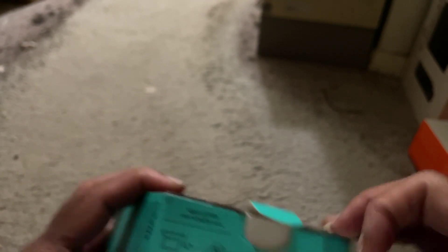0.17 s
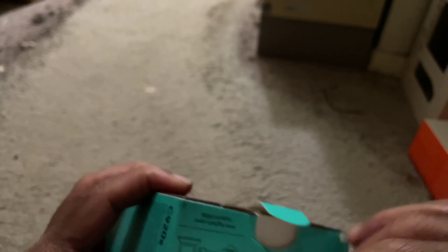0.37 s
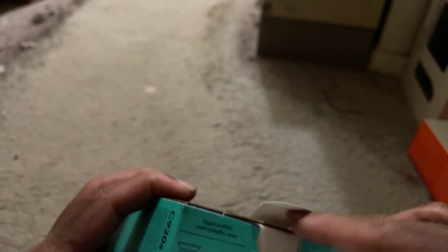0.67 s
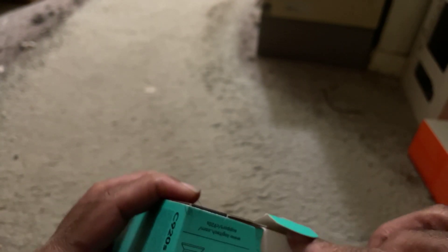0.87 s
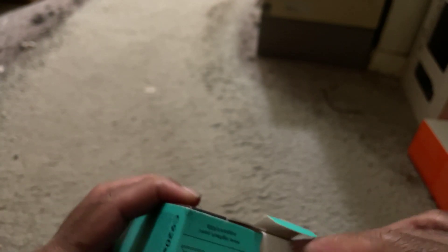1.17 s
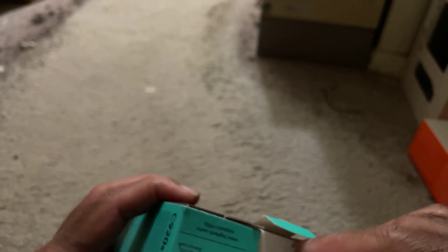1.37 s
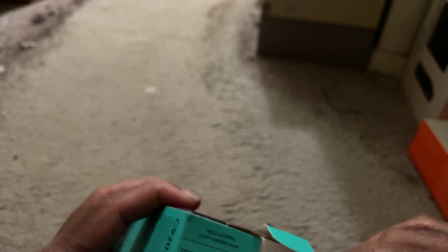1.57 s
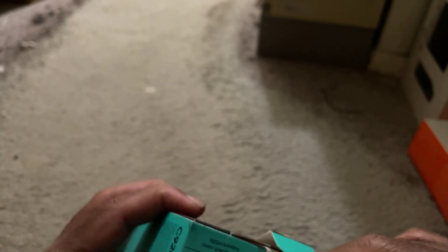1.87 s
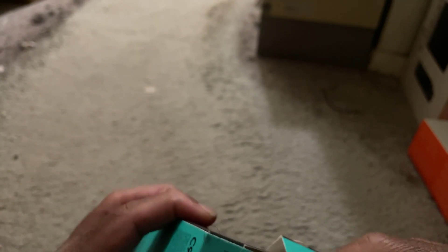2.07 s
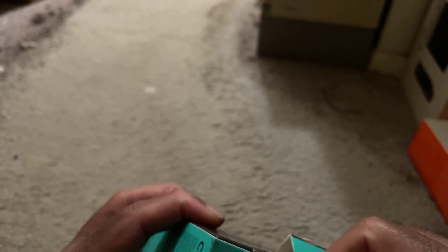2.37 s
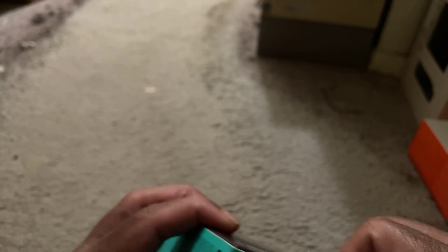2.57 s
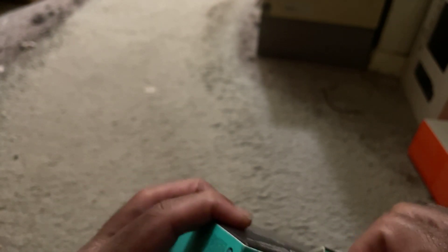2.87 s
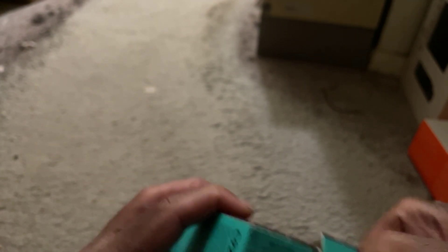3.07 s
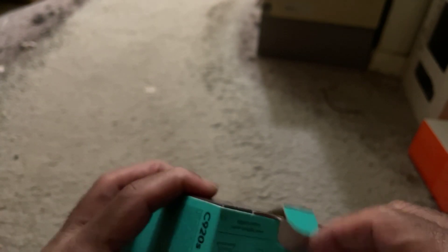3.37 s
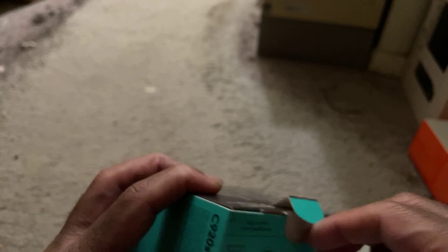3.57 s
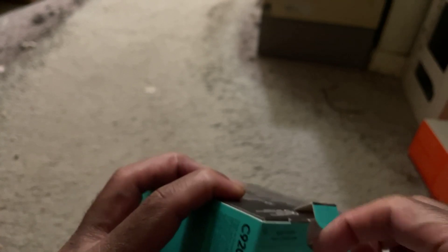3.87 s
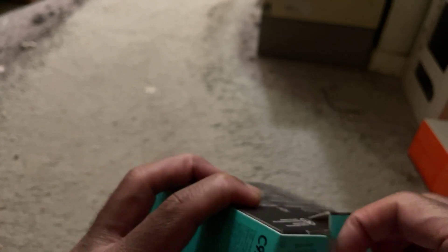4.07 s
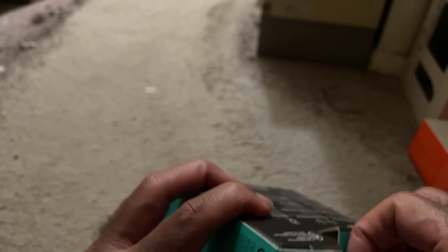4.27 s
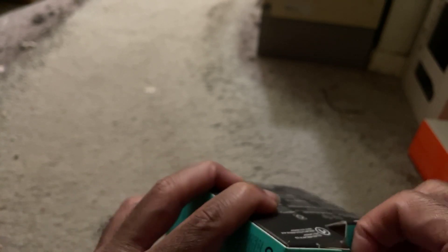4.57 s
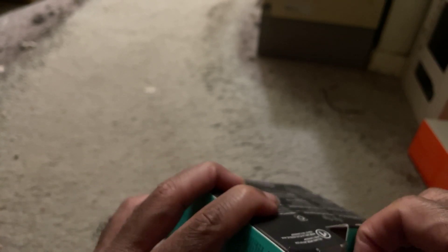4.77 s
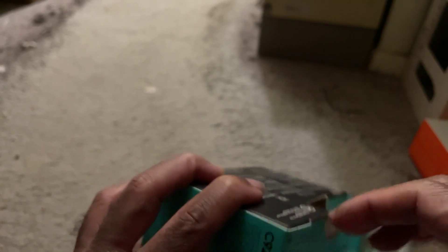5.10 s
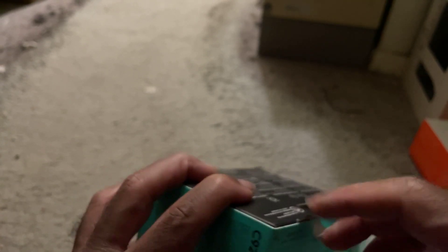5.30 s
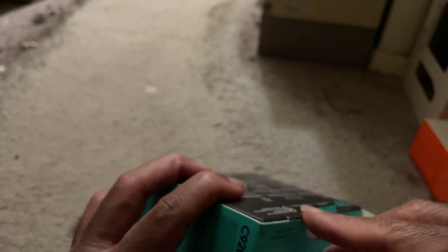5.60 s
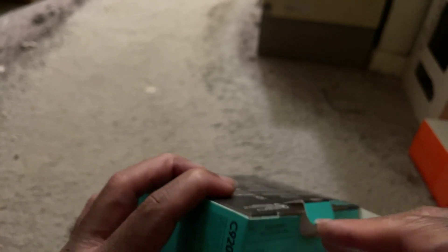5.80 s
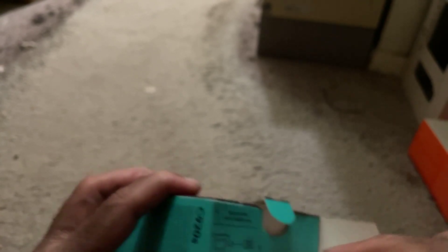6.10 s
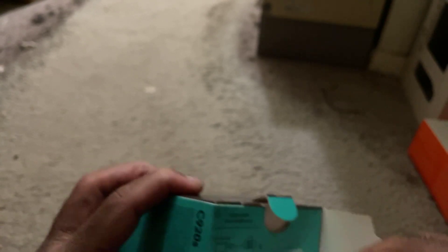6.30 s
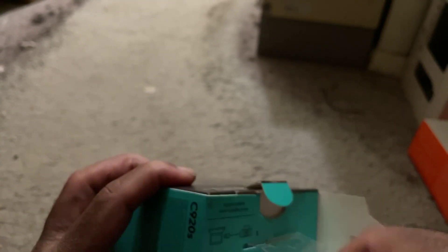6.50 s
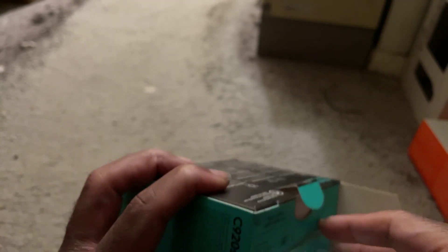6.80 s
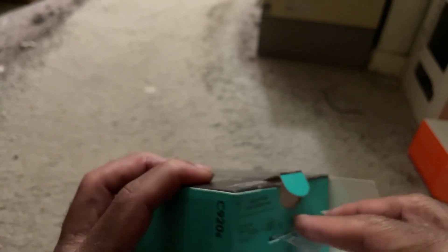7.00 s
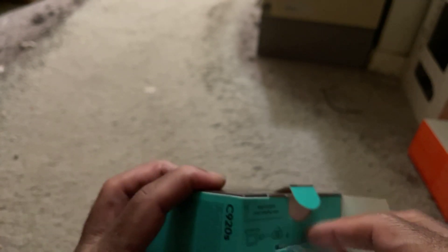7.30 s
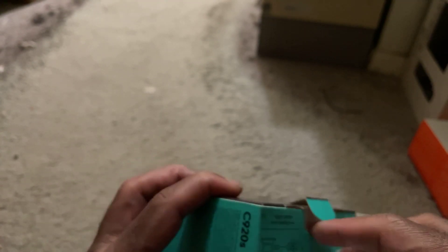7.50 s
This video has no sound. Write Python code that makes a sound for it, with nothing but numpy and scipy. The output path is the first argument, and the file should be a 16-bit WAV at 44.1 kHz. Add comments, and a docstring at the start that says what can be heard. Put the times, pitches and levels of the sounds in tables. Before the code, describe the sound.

Stiff card flaps crack and pop as nails pick at them, with faint skin rustle and rasping strokes in a quiet room.

```python
"""Hands work the lid of a small cardboard box open, close up in a quiet room with a low, wavering hum.
From the start palms rustle on the walls, nails catch and flaps snap free as bursts of tiny fractures.
Between the snaps card scrapes on card in strokes of stick and slip; snaps crowd together around
1.5-1.8 s and the hardest crack falls just after 3 s. All slips are filtered by the box's panels, whose
resonances change strength once the flap is out at 5.6 s; a soft room tail follows every sound."""
import sys
import numpy as np
from scipy import signal
from scipy.fft import rfft, irfft
from scipy.io import wavfile
from scipy.ndimage import uniform_filter1d

SR = 44100
rng = np.random.default_rng(int(sys.argv[2]) if len(sys.argv) > 2 else 0)


def materialize(psi):
    """Save the field psi as 16-bit PCM at rate SR to the path in sys.argv[1].

    A 1-D psi becomes a single channel; in a 2-D psi each row is a channel.
    """
    bounded = np.clip(np.atleast_2d(psi).T, -1, 1)
    quanta = np.round(bounded * 32767).astype(np.int16)
    wavfile.write(sys.argv[1], SR, quanta)


N = 337355


def amp(db):
    """Decibels to gain."""
    return 10 ** (np.asarray(db) / 20)


def unit(x):
    """Scales to rms 1."""
    return x / np.sqrt(np.mean(x ** 2) + 1e-20)


def read(points, hz):
    """Reads a table of (Hz, value) on a log-frequency axis."""
    f, value = np.transpose(points)
    return np.interp(np.log(hz + 1), np.log(f + 1), value)


def add(mix, s, sound):
    """Mixes a sound in at time s in seconds."""
    part = mix[max(round(s * SR), 0):][:len(sound)]
    part += sound[:len(part)]


def drift(count, rate):
    """Random wander: straight lines between normal random points, rate points a second."""
    knots = np.arange(count) * rate / SR
    points = rng.standard_normal(int(knots[-1]) + 2)
    return np.interp(knots, np.arange(len(points)), points)


def phased(gain_db):
    """Causal (minimum-phase) spectrum with the given gain in each bin."""
    log_gain = np.log(amp(np.concatenate([gain_db, gain_db[-2:0:-1]])))
    return np.exp(np.conj(signal.hilbert(log_gain)))[:len(gain_db)]


# Still air of the room, a spectral shape. Each row: frequency in Hz, relative density in dB per Hz.
AIR = [(20, -38), (32, -54), (44, 6.5), (62, 3), (76, 2.5), (100, -2.5), (122, -11), (165, -10.5),
       (400, -17), (1100, -27.5), (2000, -36.5), (5000, -40.5), (9500, -49.5), (16000, -42)]
AIR_DB = -57.5  # rms of the air, dB
# Steady tones of the hum. Each row: frequency in Hz, rms level in dB.
HUM = [(75, -62), (120, -66.5)]


def background(waver_rad=0.34):
    """Ventilation rumble and faint hiss from shaped noise, under hum tones whose phase wavers."""
    t, hz = np.arange(N) / SR, np.fft.rfftfreq(N, 1 / SR)
    noise = rfft(rng.standard_normal(N))
    air = unit(irfft(noise * amp(read(AIR, hz)), N))
    hum = np.zeros(N)
    for f, db in HUM:
        phase = 2 * np.pi * f * t + waver_rad * drift(N, rate=8.3)
        hum += amp(db) * unit(np.sin(phase))
    return amp(AIR_DB) * air + hum


def slips(count, rate, spread_db):
    """Random train of tiny slips, rate a second, a few far larger than the rest."""
    sizes = amp(spread_db * np.minimum(rng.exponential(1, count), 4))
    happens = rng.random(count) < rate / SR
    return unit(sizes * rng.choice([-1, 1], count) * happens)


def stutter(count, rate, grip_time, depth):
    """Stick and slip: the edge lets go at uneven moments and slides briefly until it grips again."""
    gaps, sizes = rng.uniform(.3, 1.7, (2, 200))
    starts = np.cumsum(gaps) / rate
    t = np.arange(count) / SR + starts[0]
    last = np.searchsorted(starts, t, "right") - 1
    return 1 + depth * sizes[last] * np.exp(-(t - starts[last]) / grip_time)


# Resonances of the box's panels.
# Each row: frequency in Hz, width in Hz, lift while shut in dB, lift once open in dB.
PANELS = [(280, 210, 10, 2), (565.5, 167, 7.5, 7), (890, 356, 5.5, 9), (1112, 130, 12.5, 8.5),
          (1417, 130, 5, 4.5), (1862, 34, 7.5, 2), (2055, 360, 4.5, 3.5), (2680, 770, 4.5, 7.5),
          (4690, 520, 5, -4), (7100, 1600, 3.5, 2), (13000, 20000, 4.5, -8)]
OPENS_AT = 5.6  # s, the flap comes out
# Colour of breaking and slipping fibres. Each row: frequency in Hz, gain in dB.
FIBRES = [(30, -11.5), (110, 1.5), (300, -1), (700, 3.5), (1500, 4.5), (3500, 5), (8300, 0), (9800, -5),
          (12500, -4.5), (15000, 0), (16500, -37.5)]


def box(s, ripple_db, ring_hz, ring_db, ring_q=2.9, damping_hz=80, ripple_hz=150, grip=0.026,
        bass_lag_s=0.01384, lag_hz=260, size=4096):
    """Response to one slip at time s: panel resonances, finer ones that vary by spot, and a ringing part."""
    hz = np.fft.rfftfreq(size, 1 / SR)
    f, width, shut_db, open_db = np.transpose(PANELS)[:, :, None]
    f = f * (1 + grip * rng.standard_normal(f.shape))  # the pitches shift from one response to the next
    lift_db = shut_db if s < OPENS_AT else open_db
    panels = (lift_db / (1 + (2 * (hz - f) / width) ** 2)).sum(0)
    ring_width = ring_hz / ring_q + damping_hz
    ring = ring_db / (1 + (2 * (hz - ring_hz) / ring_width) ** 2)
    spot = np.interp(hz / ripple_hz, np.arange(len(hz)), rng.standard_normal(len(hz)))
    gain_db = read(FIBRES, hz) + panels + ring + ripple_db * spot
    # low bending waves travel slowly, so the thump trails the crack
    lag = bass_lag_s / (1 + (hz / lag_hz) ** 2)
    lag_phase = 2 * np.pi * np.cumsum(lag) * hz[1]
    return irfft(phased(gain_db) * np.exp(-1j * lag_phase))


# Limits between the low, middle and high bands, in Hz.
BAND_EDGES_HZ = (700, 3500)
# Points where the tilt is set, in Hz: low, middle twice, high twice, top octave.
BAND_CENTRES_HZ = (450, 950, 2700, 4700, 8500, 12000)


def voiced(x, levels_db, seconds, top_db, sheen=0.62, sheen_knee_db=-5, size=2048):
    """Tilts a sound toward a level per band; the more its hiss stands out, the more top octave."""
    power = abs(rfft(x)) ** 2 * 2 / len(x) / (seconds * SR)
    band = np.digitize(np.fft.rfftfreq(len(x), 1 / SR), BAND_EDGES_HZ)
    present_db = 10 * np.log10(np.bincount(band, power) + 1e-20)
    low, middle, high = levels_db - present_db
    sharpness_db = levels_db[2] - levels_db[1] - sheen_knee_db
    top = high + top_db + sheen * np.clip(sharpness_db, -5, 5)
    points = list(zip(BAND_CENTRES_HZ, (low, middle, middle, high, high, top)))
    tilt_db = read(points, np.fft.rfftfreq(size, 1 / SR))
    return signal.fftconvolve(x, irfft(phased(tilt_db)))


# How firmly the skin slides on the walls. Each row: time in seconds, level in dB.
RUSTLE = [(0, -57.5), (0.55, -64.5), (0.73, -72.5), (2.05, -70.5), (2.55, -62.5), (2.9, -67.5),
          (3.52, -61.5), (3.96, -72), (4.601, -64), (4.77, -71), (4.98, -63), (5.58, -71.5), (5.85, -66),
          (6.55, -64.5), (6.85, -68.5), (7.33, -62), (7.45, -71.5), (7.6, -56.5)]


def rustle(body_db=-1, rasp_db=0, hiss_db=-4.0, edge_hz=4900, edge_db=3, count=60):
    """Fingers shift from spot to spot on the walls: overlapping rubs of fine, stuttering slips."""
    out, hop = np.zeros(N), N // count
    for s in np.arange(count) * hop / SR:
        pressure = signal.windows.cosine(2 * hop) * stutter(2 * hop, rate=35, grip_time=.004, depth=1)
        force = pressure * slips(2 * hop, rate=7000, spread_db=2.5)
        rub = signal.fftconvolve(force, box(s, ripple_db=2.0, ring_hz=edge_hz, ring_db=edge_db))
        add(out, s, voiced(rub, np.array([body_db, rasp_db, hiss_db]), hop / SR, top_db=-1.5))
    firmness_db = np.interp(np.arange(N) / SR, *np.transpose(RUSTLE))
    return out * amp(firmness_db)


def fractures(swell, rate, spread_db, size=96):
    """A burst of slips under a swell, its spectrum evened out as for very short breaks."""
    spectrum = rfft(slips(len(swell), rate, spread_db) * swell)
    colour_db = 10 * np.log10(abs(uniform_filter1d(abs(spectrum) ** 2, size)) + 1e-9)
    return irfft(spectrum * phased(-colour_db))


# Snaps of creases and flaps. Each row: time in seconds, crack at 700-3500 Hz in dB,
# edge above 3500 Hz in dB relative to the crack, crumbling time in seconds, part that rings.
SNAPS = [(0.016, -44.5, -7.5, 0.00026, "wall"), (0.079, -39.5, -5.5, 0.0056, "rim"),
         (0.131, -41, -7.5, 0.0029, "rim"), (0.17, -47.5, -16, 0.0034, "rim"),
         (0.287, -45, -8, 0.006, "tab"), (0.406, -44.5, -7, 0.0004, "rim"),
         (0.523, -50.5, 0, 0.0012, "rim"), (0.552, -36, -10.5, 0.0027, "crease"),
         (0.5914, -44, -15, 0.0013, "tab"), (0.663, -47, -8, 0.001, "wall"),
         (0.7962, -39.5, 6, 0.00042, "hanger"), (0.9456, -38.5, -6.5, .002, "tab"),
         (0.961, -37.5, -2.5, 0.0031, "tab"), (1.158, -49.5, -8, 0.0021, "wall"),
         (1.228, -53.5, -19, .002, "flap"), (1.357, -50, -8.5, 0.00085, "crease"),
         (1.421, -48.5, -12, 0.0009, "wall"), (1.436, -47.5, -16, 0.0018, "flap"),
         (1.4965, -44, -3, 0.00059, "tab"), (1.513, -37, -10, 0.0034, "crease"),
         (1.526, -30.5, -11, 0.0011, "tab"), (1.535, -34, -7.5, 0.00082, "flap"),
         (1.542, -39.5, -2, 0.0018, "crease"), (1.722, -43, -15, .002, "tab"),
         (1.75, -32, -13.5, 0.005, "tab"), (1.757, -37.5, -15, 0.0036, "tab"),
         (1.78, -43, -10, 0.0041, "lid"), (1.798, -43.5, -10, 0.0046, "tab"),
         (1.82, -48, -17, 0.0024, "tab"), (1.84, -46.5, -16, 0.0062, "lid"),
         (1.902, -43.5, -13, 0.0016, "rim"), (1.9181, -36.5, -12.5, 0.0051, "tab"),
         (1.939, -40, -14, 0.0064, "tab"), (1.952, -44, -9, 0.0019, "lid"),
         (2.1, -41.5, -13, 0.0035, "lid"), (2.111, -39, -14, 0.0044, "tab"),
         (2.254, -51.5, -7, 0.0032, "rim"), (2.289, -45.5, -7, 0.006, "tab"),
         (2.4389, -40, -7.5, 0.0042, "cavity"), (2.7815, -38, -9.5, 0.0023, "lid"),
         (2.786, -45.5, -11, 0.0018, "cavity"), (2.961, -46.5, -12, .004, "lid"),
         (2.977, -46, -7.5, 0.0039, "wall"), (3.0517, -40.5, 4.5, 0.001, "lid"),
         (3.057, -25, -3, 0.0011, "crease"), (3.0676, -43, 1, 0.00092, "cavity"),
         (3.134, -46.5, -8.5, 0.016, "lid"), (3.174, -56, -3, 0.0011, "rim"),
         (3.1858, -45, -5, 0.0018, "rim"), (3.2802, -48, -3, 0.0051, "wall"),
         (3.3751, -47, -4, 0.0015, "rim"), (3.592, -42.5, -16, 0.0026, "tab"),
         (3.836, -49, -4.5, 0.0025, "tab"), (3.888, -48, -6, 0.0012, "rim"),
         (3.902, -49.5, -18, 0.0036, "flap"), (3.985, -57, -5.5, 0.0033, "tab"),
         (4.014, -47.5, -4.5, .003, "wall"), (4.155, -47.5, -4, 0.0027, "rim"),
         (4.183, -50.5, -6.5, 0.0036, "flap"), (4.572, -57, -30, 0.0017, "bottom"),
         (4.932, -55, -8, 0.0035, "wall"), (4.9847, -34, -14, 0.0028, "wall"),
         (5.0055, -30.5, -0.5, 0.00077, "flap"), (5.2456, -36, -6, 0.00078, "lid"),
         (5.386, -46, -5.5, 0.0015, "flap"), (5.423, -54, -6, 0.0028, "wall"),
         (5.694, -47.5, -1.5, 0.0015, "rim"), (5.912, -42, -32, 0.0024, "bottom"),
         (6.088, -57.5, -5, 0.0014, "rim"), (6.136, -50, -26, 0.0014, "lid"),
         (6.1655, -42.5, -14.5, 0.015, "lid"), (6.305, -48, -10, .002, "lid"),
         (6.3819, -32, 2, 0.0026, "crease"), (6.389, -47, -23, 0.0037, "bottom"),
         (6.56, -50, -7.5, .0015, "crease"), (6.702, -46, -12, 0.0016, "flap"),
         (6.716, -47.5, 2.5, .006, "rim"), (6.925, -37.5, -18, 0.0033, "lid"),
         (6.9325, -38, -5.5, 0.0042, "lid"), (7.219, -51.5, -10, 0.0017, "rim"),
         (7.543, -47, -10, 0.015, "lid"), (7.573, -37.5, -7.5, .0057, "tab"),
         (7.6445, -44.5, 11.5, 0.00063, "wall")]
SNAP_SPAN = .01  # s, snap levels are rms over this long
# Parts of the box that a snap sets ringing. Each entry: pitch in Hz, sharpness Q, resonance in dB,
# thump under 700 Hz in dB relative to the crack.
PARTS = {"hanger": (7800, 2.7, 15, 6.9), "rim": (2653, 1.5, 15.5, -3.5), "tab": (2091, 5, 13.5, -6),
         "crease": (1048, 4.5, 2.5, -6), "flap": (981, 2, 14.5, -7.5), "lid": (552, 4.5, 9.5, 1.2),
         "wall": (313, 4.3, 7.7, 4.7), "bottom": (264, 4.8, 17, 6.8), "cavity": (150, 3.5, 21.7, 5)}
GRIP_DETUNE = 0.023  # share by which the grip can raise a part's pitch; it can lower it by 1.1 times this


def snaps(strain_db=-7, strain_time=0.0026, brittle_time=0.004, size=4096, lead=512):
    """A crease creaks under strain, gives way in a burst of fractures, and the freed part rings briefly."""
    out, t = np.zeros(N), (np.arange(size) - lead) / SR
    for s, crack, edge, crumbling, part in SNAPS:
        pitch, q, resonance_db, thump = PARTS[part]
        pitch = pitch * (1 + GRIP_DETUNE * rng.uniform(-1.1, 1))
        # a brittle snap spends itself in its first fracture, with little warning
        first = np.exp(-crumbling / brittle_time)
        strain = amp(strain_db) * (1 - first) * np.exp(-abs(t) / strain_time)
        crumble = np.exp(-abs(t) / max(crumbling, 1 / SR))
        swell = np.where(t < 0, strain, crumble)
        force = first * (t == 0) + fractures(swell, rate=12000, spread_db=3.5)
        response = box(s, ripple_db=3.0, ring_hz=pitch, ring_db=resonance_db, ring_q=q)
        knock = signal.fftconvolve(force, response)[:size]
        add(out, s + t[0], voiced(knock, crack + np.array([thump, 0, edge]), SNAP_SPAN, top_db=-3.5))
    return out


# Strokes of one surface over another.
# Each row: start in seconds, end in seconds, rasp at 700-3500 Hz in dB, what slides.
SCRAPES = [(0.067, 0.104, -60, "nail"), (0.145, 0.208, -56, "nail"), (0.249, 0.351, -54.5, "card"),
           (0.35, 0.4, -65, "nail"), (0.447, 0.555, -58.5, "nail"), (0.65, 0.67, -49.5, "thumb"),
           (0.924, 0.991, -51.5, "card"), (1.014, 1.1, -57, "nail"), (1.169, 1.186, -51, "crease"),
           (1.313, 1.33, -53, "crease"), (1.399, 1.449, -54, "crease"), (1.514, 1.551, -35.5, "crease"),
           (1.588, 1.661, -51, "crease"), (1.743, 1.814, -69, "crease"), (1.904, 1.988, -50.5, "card"),
           (2.103, 2.114, -45, "nail"), (2.205, 2.323, -60, "card"), (2.479, 2.504, -58, "nail"),
           (2.559, 2.611, -49.5, "card"), (3.388, 3.506, -54.5, "card"), (3.562, 3.676, -47.5, "card"),
           (3.713, 3.76, -51.5, "card"), (3.765, 3.889, -61, "card"), (4.069, 4.201, -60, "card"),
           (4.264, 4.343, -63, "nail"), (4.39, 4.456, -69.5, "nail"), (4.565, 4.705, -63.5, "thumb"),
           (4.949, 5.025, -61, "nail"), (5.037, 5.13, -55.5, "thumb"), (5.352, 5.405, -54.5, "card"),
           (5.663, 5.738, -59, "card"), (5.794, 5.849, -61.5, "thumb"), (5.87, 5.921, -48, "card"),
           (5.952, 6.084, -61.5, "thumb"), (6.15, 6.2, -48.5, "card"), (6.303, 6.39, -58.5, "nail"),
           (6.377, 6.497, -56, "flap"), (6.557, 6.704, -55, "card"), (6.803, 6.862, -65, "flap"),
           (6.855, 6.892, -56, "card"), (6.929, 6.991, -55.5, "nail"), (7.15, 7.245, -64, "thumb"),
           (7.353, 7.388, -53, "thumb"), (7.569, 7.602, -48.5, "card"), (7.588, 7.649, -50, "crease")]
# What slides in a scrape. Each entry: body under 700 Hz in dB relative to the rasp,
# hiss over 3500 Hz in dB relative to the rasp, ring in Hz, ring in dB.
CONTACTS = {"nail": (-6.5, -1, 4700, 3.5), "card": (-0.5, -5, 4700, 5.5), "crease": (-4, -14, 2000, 6),
            "thumb": (5, -3, 292, 7.5), "flap": (10, -15, 655, 10)}


def scrapes(catches_per_s=120, grip_time=0.00065, catch_depth=1.14, uneven_db=2):
    """Strokes of fine slips swell and fade, bunching each time the edge lets go and rings."""
    out = np.zeros(N)
    for start, end, level, contact in SCRAPES:
        body, hiss, edge_hz, edge_db = CONTACTS[contact]
        count = max(round((end - start) * SR), 256)
        pressure = signal.windows.tukey(count, .6) * stutter(count, catches_per_s, grip_time, catch_depth)
        pressure = pressure * amp(uneven_db * drift(SR, rate=70)[:count])  # the hand presses unevenly
        force = pressure * slips(SR // 4, rate=8600, spread_db=4.5)[:count]
        rasp = signal.fftconvolve(force, box(start, ripple_db=3.0, ring_hz=edge_hz, ring_db=edge_db))
        add(out, start, voiced(rasp, level + np.array([body, 0, hiss]), count / SR, top_db=-1.5))
    return out


# Decay of the room. Each row: frequency in Hz, time to fall by 60 dB in seconds.
ROOM = [(100, 0.13), (600, 0.16), (3000, 0.14), (8000, 0.16), (16000, 0.1)]


def room(x, wet_db=-15, gap_s=0.0072, size=22050):
    """Soft tail of a carpeted room: noise after a short gap, each band dying at its own speed."""
    taps = rng.standard_normal(size) * (np.arange(size) > gap_s * SR)
    hz, t, z = signal.stft(taps, SR, nperseg=256)
    decay = amp(-60 * t / read(ROOM, hz)[:, None])
    tail = signal.istft(z * decay, SR, nperseg=256)[1]
    return amp(wet_db) * signal.oaconvolve(x, tail / np.linalg.norm(tail))[:N]


def scene():
    """The box in the hands, its room tail and the background."""
    handling = rustle() + snaps() + scrapes()
    return (handling + room(handling) + background())[None]


CUTOFF_HZ = 16300


def record(dry):
    """Band limit: a steep low-pass takes away the highest treble."""
    lowpass = signal.firwin(401, CUTOFF_HZ, window=("kaiser", 8), fs=SR)
    return signal.oaconvolve(dry, lowpass[None], "same")


dry = scene()
out = record(dry)
materialize(out)
```